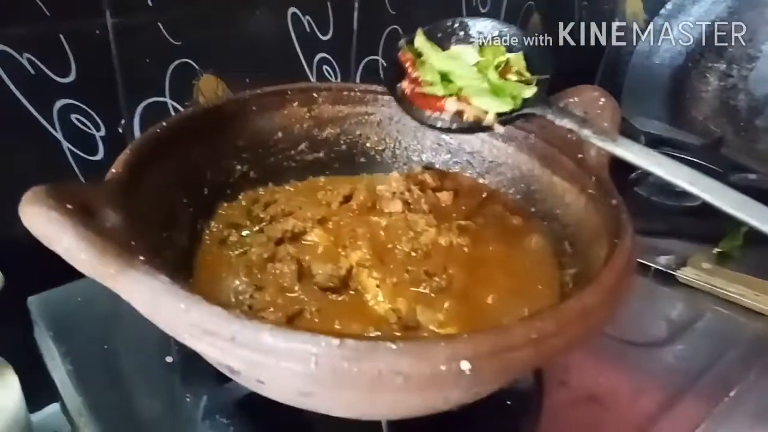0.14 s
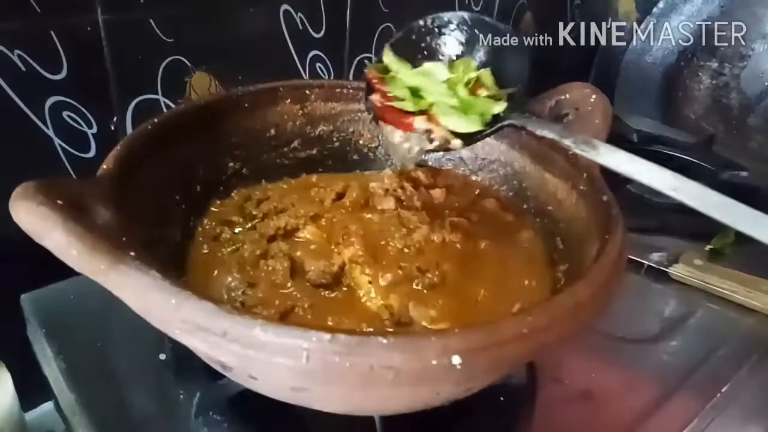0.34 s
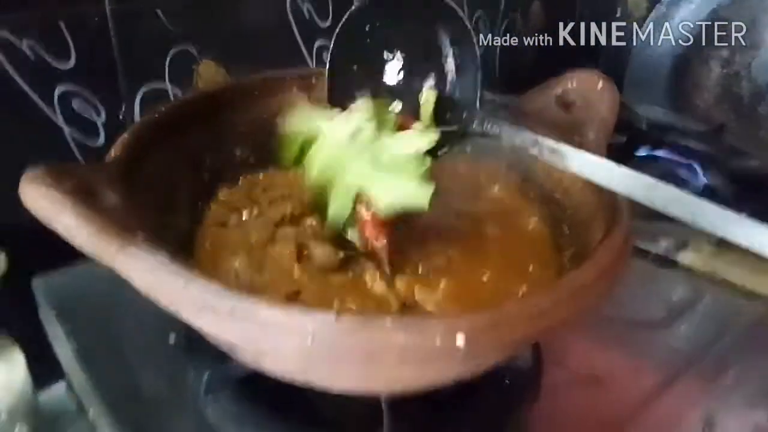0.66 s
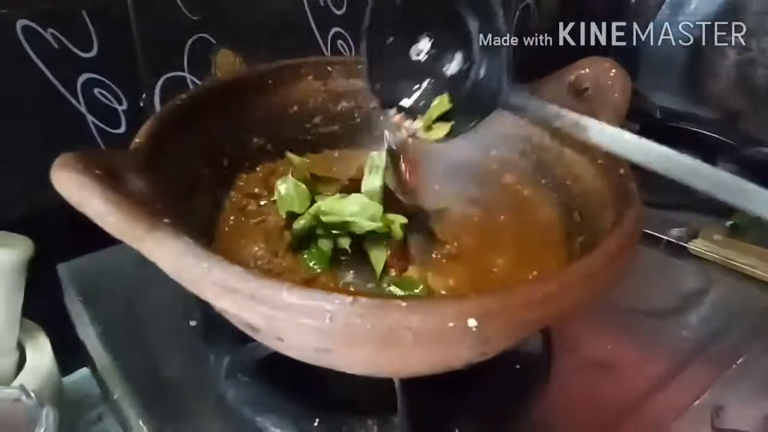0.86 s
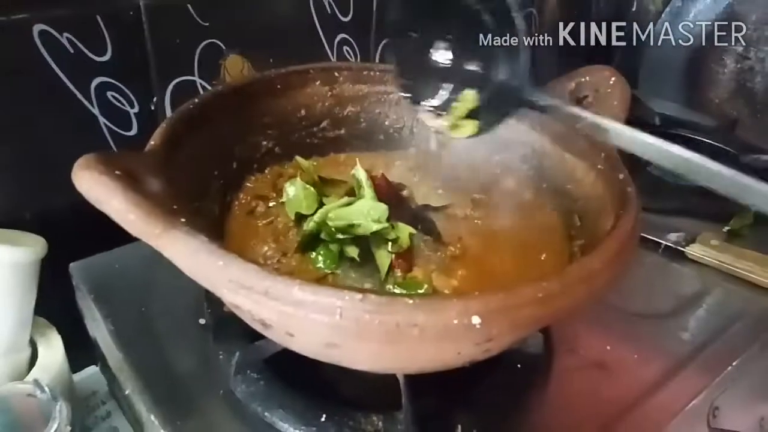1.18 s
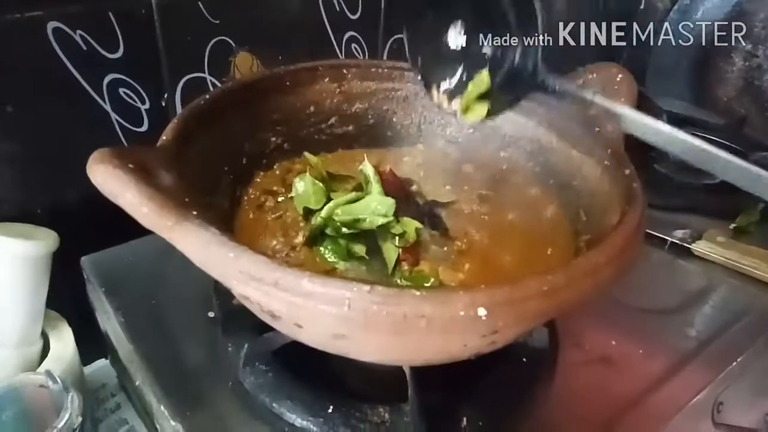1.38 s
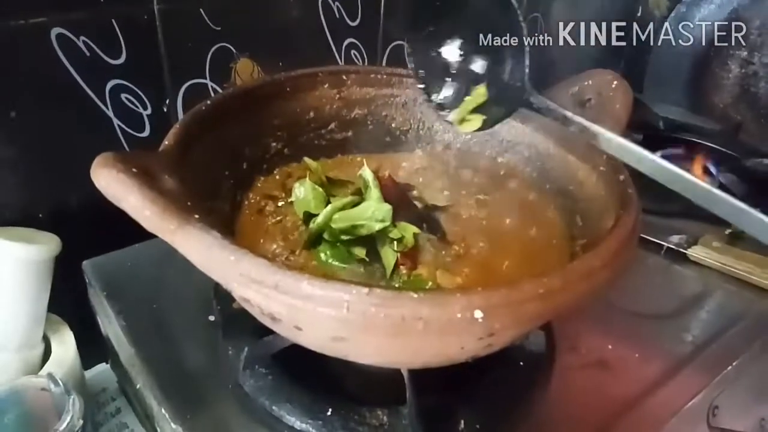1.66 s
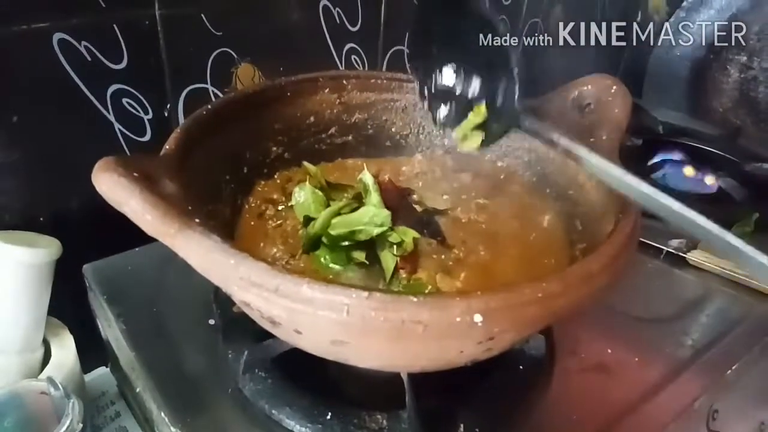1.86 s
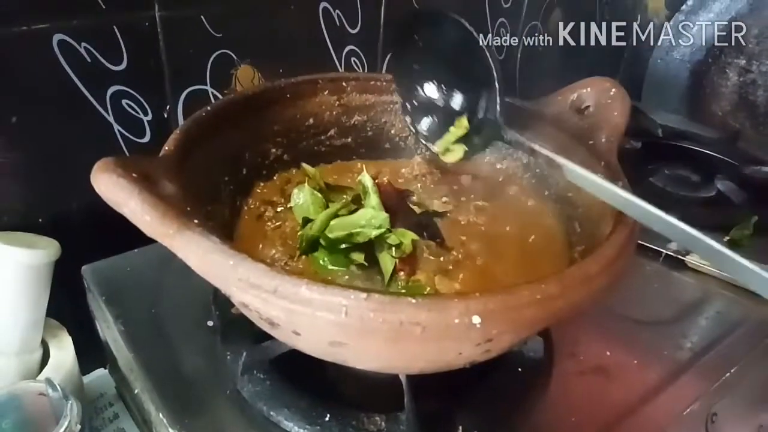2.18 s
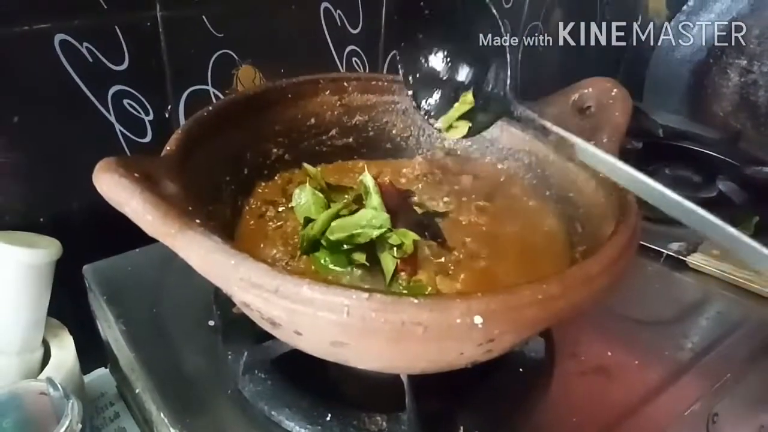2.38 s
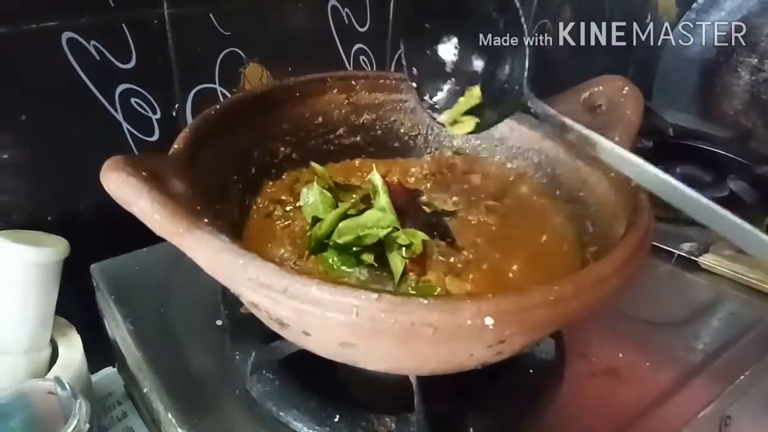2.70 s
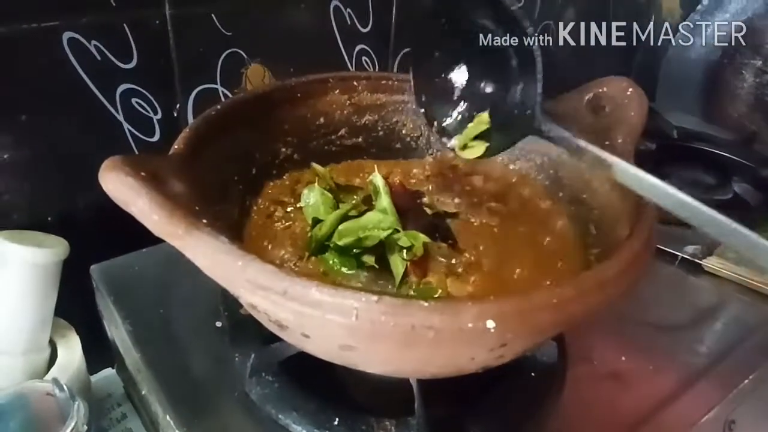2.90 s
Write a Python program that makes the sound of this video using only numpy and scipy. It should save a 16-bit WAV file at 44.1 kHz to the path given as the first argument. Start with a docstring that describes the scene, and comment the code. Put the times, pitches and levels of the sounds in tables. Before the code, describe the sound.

Hot oil sizzles in a clay pot of curry, close up. At first it fries faintly and spits a few times. At 0.5 seconds it is poured in, starting a loud, dense, crackling sizzle. From about 1.8 seconds this wavers and eases slightly, with more spits and a soft knock on the pot near 2.2 seconds, continuing to the end at 3. Faint gurgles and quiet kitchen rumble lie underneath.

```python
"""A small kitchen, a phone microphone close to a clay pot of thick, simmering curry.
A ladle of hot spiced oil spits a few times and, half a second in, is tipped into the pot. The oil
flashes water to steam: a dense crackling sizzle that surges and sags, with a few fuzzy whistles.
Under it the sauce gurgles, the pot rings with soft knocks and the room rumbles quietly."""
import sys
import numpy as np
from scipy import signal
from scipy.fft import rfft, irfft
from scipy.io import wavfile
from scipy.ndimage import uniform_filter1d

SR = 44100
rng = np.random.default_rng(int(sys.argv[2]) if len(sys.argv) > 2 else 0)


def materialize(psi):
    """Save the field psi as 16-bit PCM at rate SR to the path in sys.argv[1].

    A 1-D psi becomes a single channel; in a 2-D psi each row is a channel.
    """
    bounded = np.clip(np.atleast_2d(psi).T, -1, 1)
    quanta = np.round(bounded * 32767).astype(np.int16)
    wavfile.write(sys.argv[1], SR, quanta)


N = 134505
TOP_HZ = 15520  # upper edge of what the microphone hears

# Sizzle in the pot, close up: t/s, treble level/dB, body level/dB
SIZZLE_LEVELS = [(0.49, -30, -55), (0.52, -21, -50), (0.53, -25, -74), (0.56, -19, -40.5), (0.62, -24, -51),
                 (0.64, -22, -42.5), (0.74, -21.5, -42), (0.77, -19, -38.5), (1.05, -18.5, -37.5),
                 (1.11, -20, -39), (1.55, -18, -33.5), (1.57, -19.5, -38), (1.61, -19, -36),
                 (1.76, -20.5, -36), (1.775, -24, -42.5), (1.81, -24, -41), (1.83, -19.5, -36.5),
                 (1.99, -22.5, -40), (2.08, -21.5, -37), (2.09, -25.5, -44), (2.12, -22, -36),
                 (2.27, -20.5, -38), (2.29, -28.5, -47.5), (2.36, -22, -44), (2.37, -22.5, -37.5),
                 (2.44, -21, -35.5), (2.465, -25.5, -46), (2.5, -23.5, -39.5), (2.64, -21, -40.5),
                 (2.66, -25, -45.5), (2.8, -22.5, -41.5), (2.84, -26, -49), (2.93, -21, -38),
                 (3.01, -26.5, -46), (3.05, -20, -41)]
# Its spectrum: f/Hz, level/dB
SIZZLE_SPECTRUM = [(400, -27.5), (623, -23), (847, -15), (1050, -20.5), (1380, -15.5), (1590, -22),
                   (1960, -13.5), (2250, -21), (2510, -14.5), (3620, -11.5), (4420, -9), (6580, -1),
                   (7400, -2), (8150, -6.5), (10100, 0), (13600, -9), (14100, -8), (14700, 4), (15400, -2)]
def sizzle():
    """Hot oil flashes the sauce's water to steam; treble and body follow their own levels."""
    flicker_db = unit_rms(uniform_filter1d(rng.standard_normal(N), round(.004 * SR)))
    steam = crackle(per_s=3000, spread_db=3.5) + amp(3) * rng.standard_normal(N)
    snaps = amp(-10) * crackle(per_s=350, spread_db=3.5, decay_s=.00012)
    fizz = reflect(steam * amp(flicker_db) + snaps + amp(-11.5) * steam_bubbles())
    fizz = colour(patchy(fizz, depth_db=1.1), SIZZLE_SPECTRUM)
    # one band rings while the pour is fresh, then slowly fades
    ring_hz, width_hz, fade_db_per_s = 3930, 240, 1.5
    ring = signal.lfilter(*signal.iirpeak(ring_hz, ring_hz / width_hz, SR), fizz)
    fizz = fizz + ring * amp(-1 - fade_db_per_s * np.arange(N) / SR)
    low = signal.sosfiltfilt(signal.butter(2, 4250, fs=SR, output="sos"), fizz)
    treble = unit_rms(fizz - low) * amp(curve(SIZZLE_LEVELS, 1))
    body = unit_rms(low) * amp(curve(SIZZLE_LEVELS, 2))
    return spread_down(treble + body, start_s=SIZZLE_LEVELS[0][0])


def spread_down(x, start_s, s_per_octave=.021, rise_s=.012):
    """The sizzle opens in the treble; each band fades in later the lower it lies."""
    hz, t, spectrum = signal.stft(x, SR, nperseg=256, noverlap=192)
    onset = start_s + s_per_octave * np.log2(TOP_HZ / (hz[:, None] + 500))
    fade_in = np.clip((t - onset) / rise_s, 0, 1)
    return signal.istft(spectrum * fade_in, nperseg=256, noverlap=192)[1][:N]


def crackle(per_s, spread_db, decay_s=.00035, kinds=24):
    """Tiny steam bursts: short noise puffs, most small, a few large."""
    t = np.arange(400) / SR
    bursts = amp(spread_db * np.minimum(rng.exponential(1, N), 5)) * (rng.random(N) < per_s / SR)
    kind = rng.integers(0, kinds, N)
    puffs = rng.standard_normal((kinds, len(t))) * np.exp(-t / decay_s)
    return unit_rms(sum(signal.oaconvolve(bursts * (kind == k), puffs[k])[:N] for k in range(kinds)))


def steam_bubbles(per_s=400, low_hz=1331, high_hz=12000, life_cycles=27.5, kinds=40):
    """Small steam pockets ring in the sizzle, each a short rising pip."""
    out, t = np.zeros(N), np.arange(2000) / SR
    pops = amp(4.6 * np.minimum(rng.exponential(1, N), 4)) * (rng.random(N) < per_s / SR)
    kind = rng.integers(0, kinds, N)
    for k, hz in enumerate(np.geomspace(low_hz, high_hz, kinds)):
        age = t * hz / life_cycles
        pip = age * np.exp(-3 * age) * np.sin(2 * np.pi * hz * t * (1 + .0376 * age))
        out += signal.oaconvolve(pops * (kind == k), pip / np.linalg.norm(pip) * np.sqrt(hz))[:N]
    return unit_rms(out)


# Oil spitting near the microphone: t/s, level/dB, first f/Hz, second f/Hz, second level/dB re first
OIL_SPITS = [(0.021, -39, 7200, 6000, -10), (0.0466, -22, 14800, 9700, -1),
             (0.1562, -10.5, 6200, 4340, -5.5), (0.206, -28, 4070, 6500, -10),
             (0.2674, -31, 9800, 5030, -4), (0.332, -30, 10600, 12000, -4), (0.3713, -29, 12300, 14900, -6),
             (0.3799, -21.5, 5140, 9500, -7), (0.502, -23, 10000, 6040, -3), (.519, -23, 10500, 6800, 7),
             (1.907, -17, 5400, 6500, -3), (2.196, -17, 6000, 7000, -5), (2.297, -28, 14600, 9800, -11),
             (2.3204, -13, 9700, 7000, -1), (2.322, -17, 9800, 12000, -4), (2.374, -16, 4060, 4500, -11),
             (2.3965, -15, 6760, 9800, -5)]
# Spectrum of the oil's cracks and of its faint frying: f/Hz, level/dB
OIL_SPECTRUM = [(590, -29), (1000, -16.5), (1750, -9), (2500, -5), (2740, -11.5), (3410, -6), (3700, -12),
                (6710, -4.5), (8250, -10), (10300, -5.5), (13500, -14.5), (15500, -8)]
def spits(crack_s=.0004, ring_s=.00065, spray_s=.0094):
    """Hot oil spits: a sharp crack, a brief two-note ring and a short spray after it."""
    out, t = np.zeros(N), np.arange(3000) / SR
    noise = rng.standard_normal((len(OIL_SPITS), 2, len(t)))
    spray_band = signal.butter(4, [2660, 7400], "band", fs=SR, output="sos")
    for (s, db, hz, second_hz, second_db), (crack_noise, spray_noise) in zip(OIL_SPITS, noise):
        crack = unit_rms(colour(crack_noise, OIL_SPECTRUM)[:len(t)]) * np.exp(-t / crack_s)
        crack *= amp(4 + .4 * db)  # louder spits have more crack for their ring
        ring = np.sin(2 * np.pi * hz * t) + amp(second_db) * np.sin(2 * np.pi * second_hz * t)
        ring *= np.exp(-t / ring_s)
        spray = amp(-24.5) * unit_rms(signal.sosfilt(spray_band, spray_noise))
        spray *= t / spray_s * np.exp(1 - t / spray_s)
        low_cut = signal.butter(4, .65 * min(hz, second_hz), "high", fs=SR, output="sos")
        add(out, s, amp(db) * (signal.sosfilt(low_cut, crack + ring) + spray))
    return out


def frying():
    """The oil fries throughout, a faint steady crackle and hiss."""
    steam = crackle(per_s=900, spread_db=3) + amp(5) * rng.standard_normal(N)
    return amp(-42) * unit_rms(colour(steam, OIL_SPECTRUM))


# Steam escaping from the pot: start t/s, length/s, f/Hz, level/dB
STEAM_TONES = [(0.513, 0.1, 10100, -32.5), (0.77, 0.13, 2520, -44), (1.002, 0.078, 4020, -37),
               (1.154, .04, 3930, -40)]
def steam_tones(blur_hz=220):
    """Escaping steam sings: narrow noise around a pitch under a smooth swell."""
    out, noise = np.zeros(N), rng.standard_normal((len(STEAM_TONES), 2, 8000))
    for (s, length, hz, db), pair in zip(STEAM_TONES, noise):
        t = np.arange(min(round(length * SR), 6000)) / SR
        blur = signal.lfilter(*signal.butter(2, blur_hz, fs=SR), pair)[:, -len(t):]
        wobble = blur[0].std() + blur[0] + 1j * blur[1]
        tone = (wobble * np.exp(2j * np.pi * hz * t)).real
        add(out, s, amp(db) * unit_rms(tone) * np.sqrt(np.sin(np.pi * t / length)))
    return out


# Gurgles down in the sauce: centre t/s, level/dB, f/Hz, half-length/s
SAUCE_GURGLES = [(.185, -45, 142.7, 0.033), (0.287, -47.5, 304.4, 0.071), (0.333, -45.5, 135.2, .1),
                 (0.504, -40, 140.8, 0.059), (.79, -54.5, 170.2, 0.091), (1.039, -51.5, 168, 0.032),
                 (1.284, -45, 146.3, 0.07), (1.517, -41.5, 135, 0.057), (1.747, -47.5, 258, 0.048),
                 (1.954, -48.5, 173.6, 0.082), (2.21, -42, 188.7, .05), (2.64, -50, 139, 0.057),
                 (2.78, -48, 121.3, 0.091), (2.926, -49.5, 203, 0.083)]
def gurgles(rise=.124, clarity=1.3):
    """Thick bubbles heave and burst: a blurred low tone and its octave, rising a little."""
    out, noise = np.zeros(N), rng.standard_normal((len(SAUCE_GURGLES), 2, 2, 8000))
    for (s, db, hz, half_s), pairs in zip(SAUCE_GURGLES, noise):
        progress = np.linspace(-1, 1, min(round(2 * half_s * SR), 8000))
        phase = 2 * np.pi * np.cumsum(hz * (1 + rise * progress)) / SR
        blur = signal.lfilter(*signal.butter(2, .3 * hz, fs=SR), pairs)[..., -len(progress):]
        wobble = clarity + (blur[:, 0] + 1j * blur[:, 1]) / blur.std()
        tone = (wobble[0] * np.exp(1j * phase) + amp(-8.5) * wobble[1] * np.exp(2j * phase)).real
        add(out, s - half_s, amp(db) * unit_rms(tone) * np.exp(-4.5 * progress ** 2))
    return out


# Soft knocks on the pot: t/s, level/dB
POT_KNOCKS = [(2.158, -28.5), (2.1655, -29.5), (2.178, -32)]
# Modes of the clay pot: f/Hz, level/dB, T60/s
POT_MODES = [(330, -9, .04), (570, -5, .06), (700, 0, .04), (840, -1, .04), (1480, -4, .03),
             (2070, 0, .035)]
def knocks():
    """Each knock briefly rings the modes of the clay pot."""
    out, t = np.zeros(N), np.arange(6000) / SR
    ring = sum((-1) ** k * amp(db - 60 * t / t60) * np.sin(2 * np.pi * hz * t)
               for k, (hz, db, t60) in enumerate(POT_MODES))
    for s, db in POT_KNOCKS:
        add(out, s, amp(db) * ring / abs(ring).max())
    return out


def thud(start_s=.1525, hz=144, rise_s=.0038):
    """A short, damped low swing under the largest spit."""
    out, t = np.zeros(N), np.arange(3000) / SR
    envelope = t / rise_s * np.exp(1 - t / rise_s)
    add(out, start_s, -amp(-27.5) * envelope * np.sin(2 * np.pi * hz * t))
    return out


# A faint whistle before the pour: t/s, f/Hz, level/dB
WHISTLE_GLIDE = [(.02, 3253, -54), (.118, 3340, -51)]
def whistle(blur_hz=60, clarity=1.8, fade_s=.009):
    """A thin, rough tone that rises slightly."""
    t = np.arange(N) / SR
    gate = np.clip(np.minimum(t - WHISTLE_GLIDE[0][0], WHISTLE_GLIDE[-1][0] - t) / fade_s, 0, 1)
    blur = signal.lfilter(*signal.butter(2, blur_hz, fs=SR), rng.standard_normal((2, N)))
    wobble = clarity * blur[0].std() + blur[0] + 1j * blur[1]
    phase = 2 * np.pi * np.cumsum(curve(WHISTLE_GLIDE, 1)) / SR
    return gate * amp(curve(WHISTLE_GLIDE, 2)) * unit_rms((wobble * np.exp(1j * phase)).real)


# Set gain curve on the rumble and hums: t/s, level/dB
RUMBLE_GAIN = [(0, -46.5), (.45, -47), (.58, -49.5), (.7, -62.5), (.8, -52), (.87, -60), (1.0, -53.5),
               (1.16, -57.5), (1.3, -52.5), (1.7, -54), (1.8, -57), (1.9, -51.5), (2.12, -51.5),
               (2.44, -48.5), (2.49, -52), (2.56, -50), (3.05, -50)]
# Spectrum of the room rumble: f/Hz, level/dB
RUMBLE_SPECTRUM = [(15, -17), (27, -11), (60, -1), (80, -8), (107, -8), (209, -5.5), (394, -7), (501, -10),
                   (867, -7.5), (994, -9), (1500, -9), (1950, -39.5)]
def rumble():
    """Low room rumble and hums, turned down by a set curve as the sizzle starts and in later dips."""
    noise = unit_rms(colour(patchy(rng.standard_normal(N), depth_db=2.5), RUMBLE_SPECTRUM))
    room = (noise + hums()) * amp(curve(RUMBLE_GAIN, 1))
    return signal.sosfilt(signal.butter(2, 1600, fs=SR, output="sos"), room)


# Hums in the rumble: f/Hz, width/Hz, level/dB re the rumble
ROOM_HUMS = [(65.4, 9.2, -9.5), (99, 10, -8), (135.7, 16, -8.5), (251, 10, -12.5), (437, 21, -14.5),
             (841, 43, -11.5)]
def hums():
    """Narrow bands of noise, heard as wavering tones."""
    hz, spectrum = np.fft.rfftfreq(N, 1 / SR), rfft(rng.standard_normal(N))
    return sum(amp(db) * unit_rms(irfft(spectrum * np.exp(-2 * ((hz - centre) / width) ** 2), N))
               for centre, width, db in ROOM_HUMS)


def reflect(x, t60_s=.08, echo_db=-13):
    """Pot and walls throw the sound back to the microphone: sparse echoes that die away."""
    echoes, delays = np.zeros(SR // 2), np.arange(60, SR // 2 - 30, 30)
    delays += rng.integers(0, 30, len(delays))
    echoes[delays] = rng.choice([-1., 1.], len(delays)) * amp(-60 * delays / SR / t60_s)
    return x + amp(echo_db) * signal.oaconvolve(x, echoes / np.linalg.norm(echoes))[:N]


def patchy(x, depth_db):
    """Random louder and softer patches over time and frequency."""
    spectrum = signal.stft(x, nperseg=512, noverlap=384)[2]
    noise = rng.standard_normal(spectrum.T.shape)
    patches = unit_rms(uniform_filter1d(uniform_filter1d(noise, 12, axis=0), 8, axis=1)).T
    return signal.istft(spectrum * amp(depth_db * patches), nperseg=512, noverlap=384)[1][:N]


def colour(x, spectrum, size=4096):
    """Causal filter with the given spectrum, falling away below its first point."""
    point_hz, db = np.transpose(spectrum)
    hz = np.fft.rfftfreq(size, 1 / SR) + 1
    gain = amp(np.interp(np.log(hz), np.log(point_hz), db)) * np.minimum(hz / point_hz[0], 1) ** 2
    log_gain = np.log(np.concatenate([gain, gain[-2:0:-1]]))
    minimum_phase = np.exp(np.conj(signal.hilbert(log_gain)))
    return signal.oaconvolve(x, np.fft.ifft(minimum_phase).real)[:N]


def amp(db):
    """dB to gain."""
    return 10 ** (np.asarray(db) / 20)


def unit_rms(x):
    """Scales to rms 1."""
    return x / np.sqrt(np.mean(x ** 2) + 1e-20)


def curve(table, column):
    """One column of a time table, per sample."""
    table = np.array(table)
    return np.interp(np.arange(N) / SR, table[:, 0], table[:, column])


def add(mix, s, sound):
    """Mixes a sound in at s seconds."""
    part = mix[round(s * SR):][:len(sound)]
    part += sound[:len(part)]


def scene():
    """Pot and ladle up close, the kitchen behind, in mono."""
    pot = sizzle() + steam_tones() + reflect(spits() + knocks() + thud()) + gurgles()
    return (pot + rumble() + frying() + whistle())[None]


def record(dry, ceiling=.48):
    """The phone microphone softly rounds the peaks, then cuts the highest treble."""
    rounded = ceiling * np.tanh(dry / ceiling)
    low_pass = signal.firwin(1023, TOP_HZ, window=("kaiser", 9), fs=SR)
    return signal.oaconvolve(rounded, low_pass[None], "same")


dry = scene()
out = record(dry)
materialize(out)
```